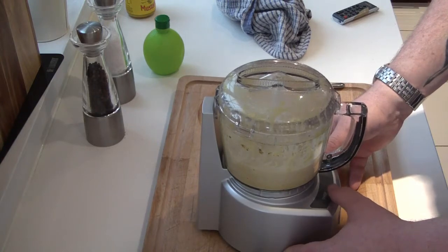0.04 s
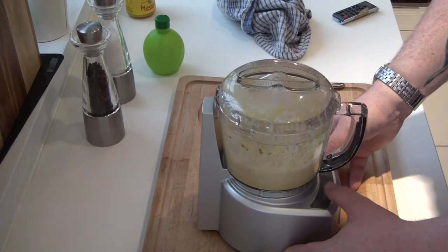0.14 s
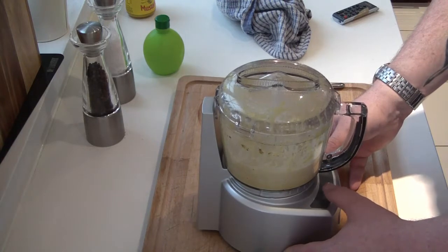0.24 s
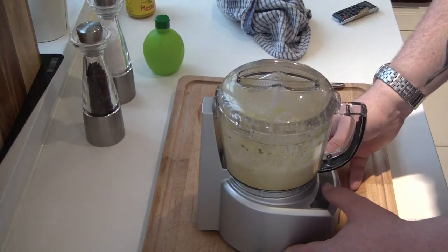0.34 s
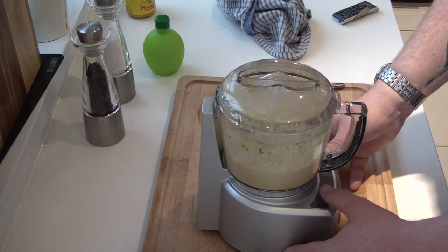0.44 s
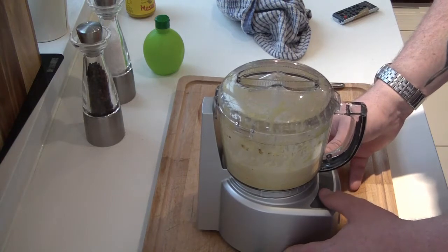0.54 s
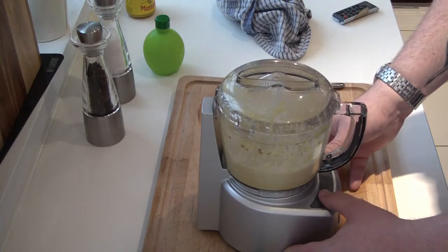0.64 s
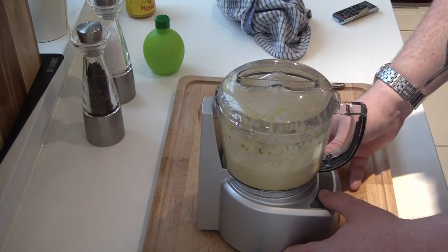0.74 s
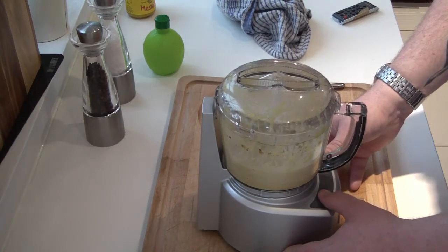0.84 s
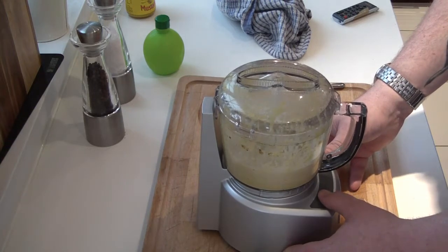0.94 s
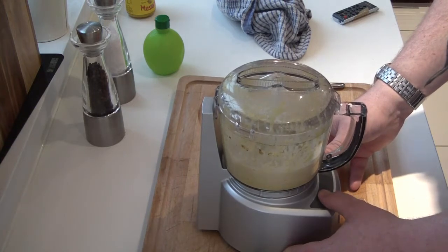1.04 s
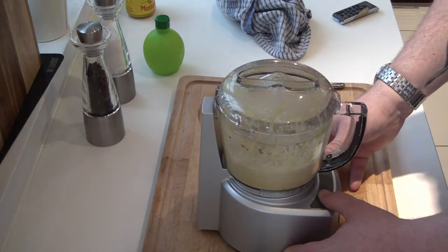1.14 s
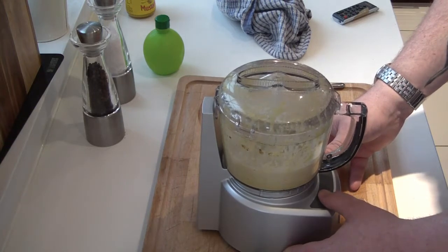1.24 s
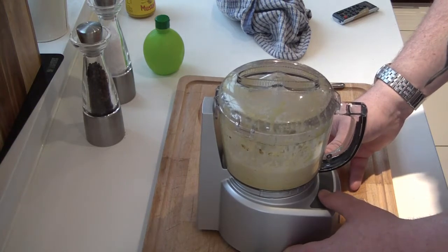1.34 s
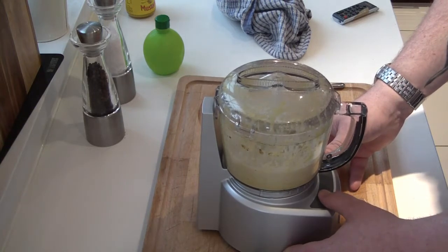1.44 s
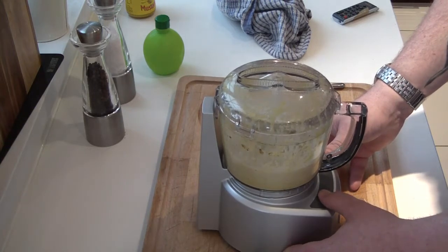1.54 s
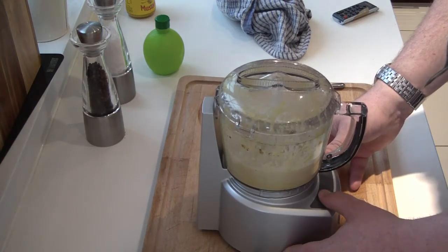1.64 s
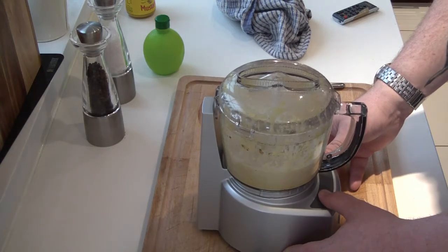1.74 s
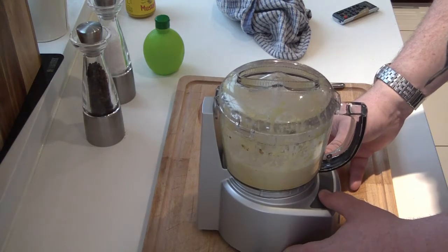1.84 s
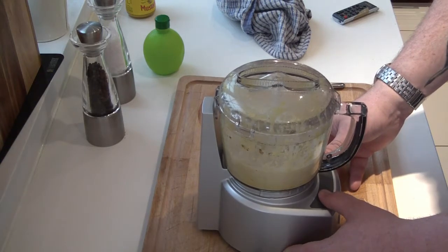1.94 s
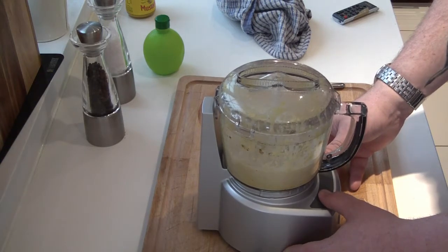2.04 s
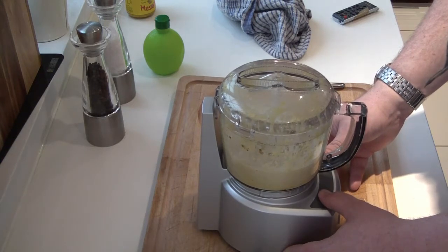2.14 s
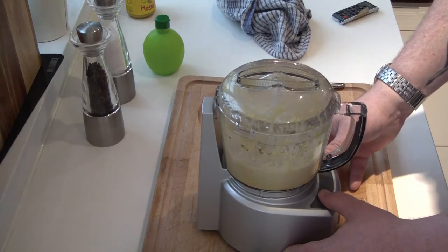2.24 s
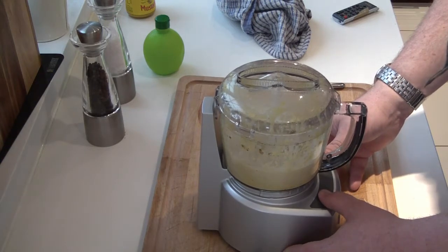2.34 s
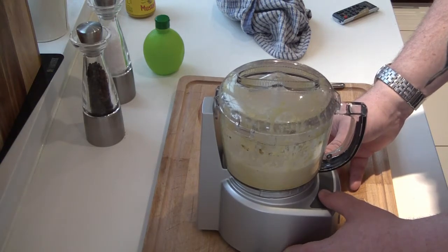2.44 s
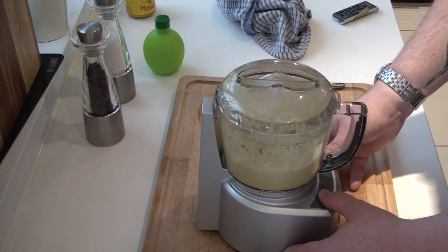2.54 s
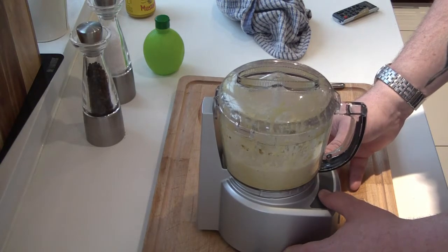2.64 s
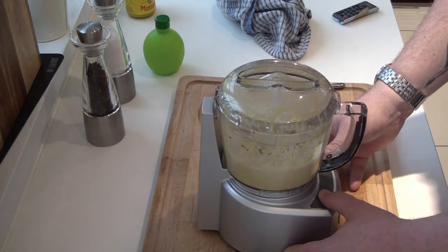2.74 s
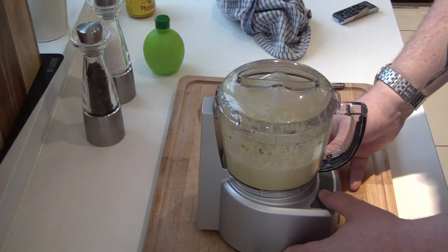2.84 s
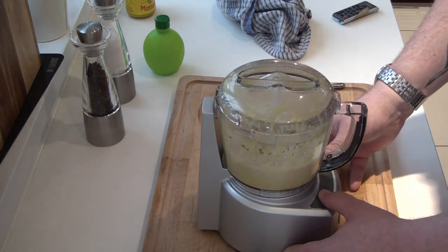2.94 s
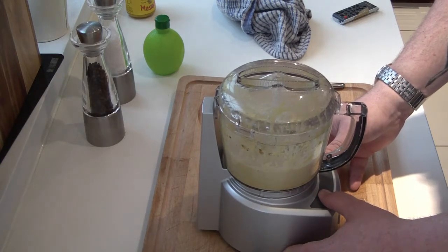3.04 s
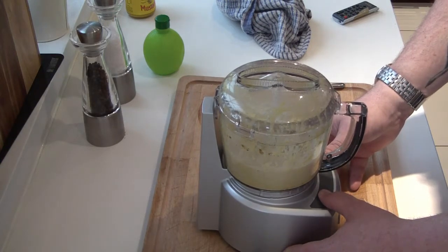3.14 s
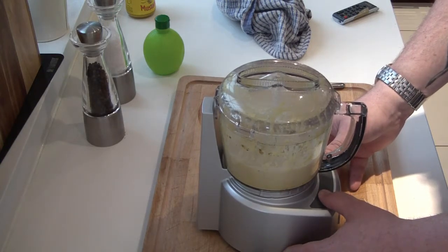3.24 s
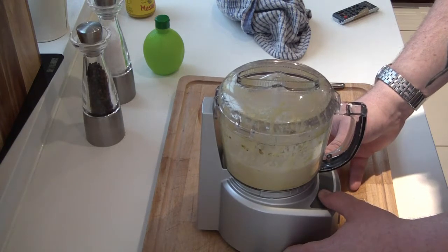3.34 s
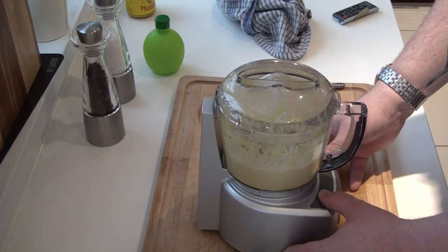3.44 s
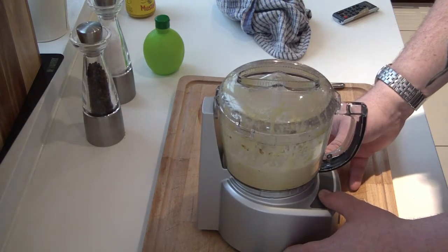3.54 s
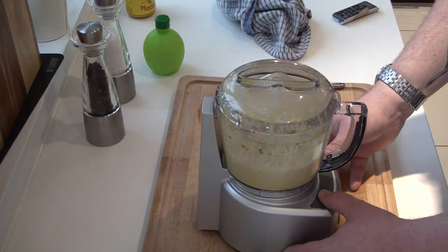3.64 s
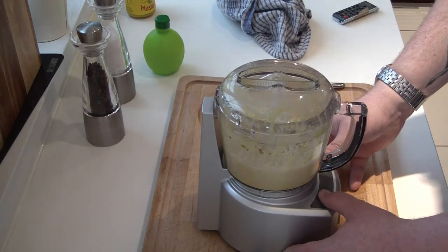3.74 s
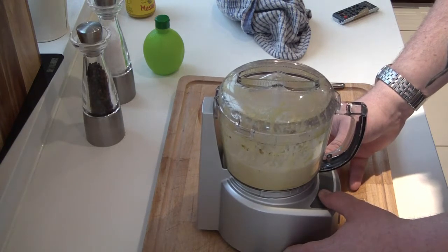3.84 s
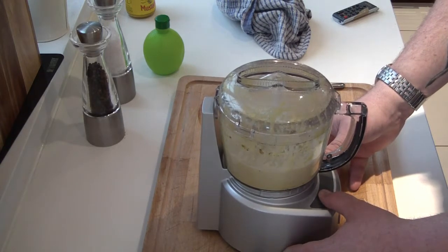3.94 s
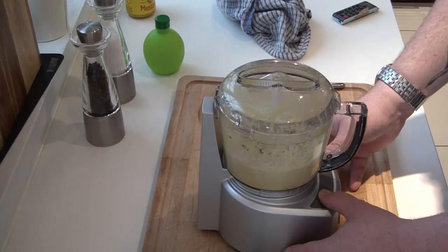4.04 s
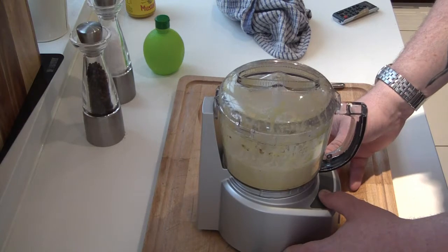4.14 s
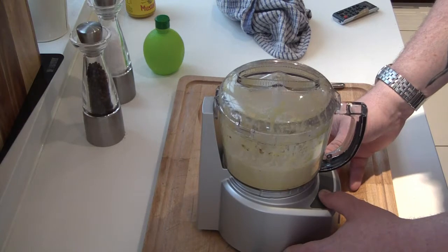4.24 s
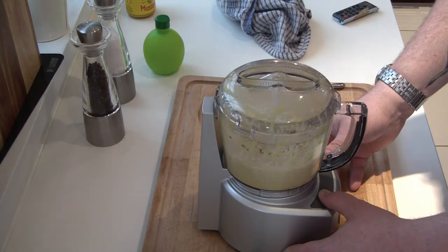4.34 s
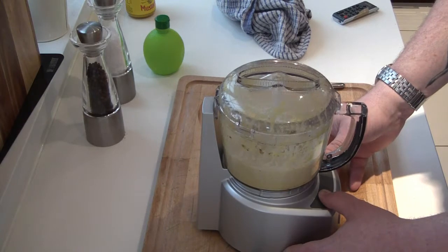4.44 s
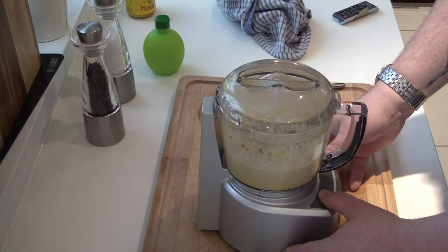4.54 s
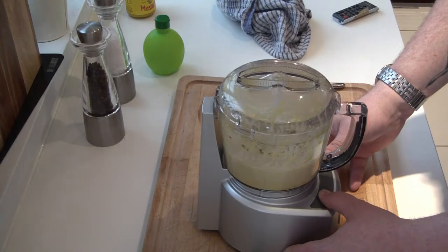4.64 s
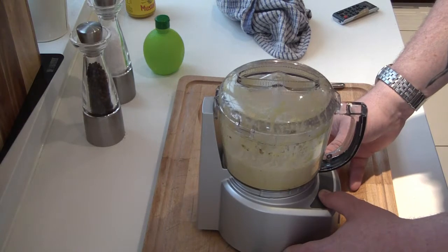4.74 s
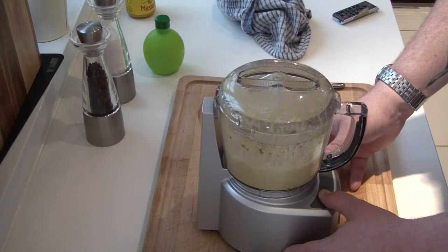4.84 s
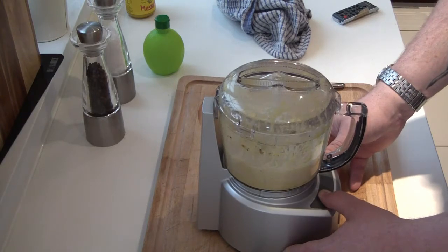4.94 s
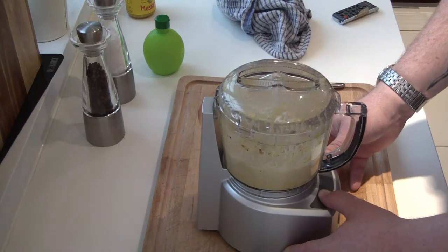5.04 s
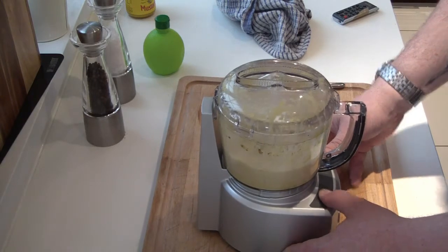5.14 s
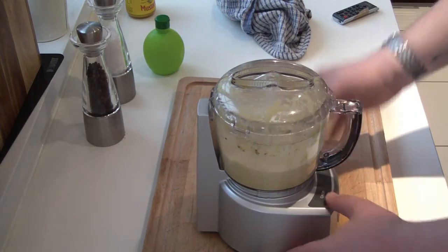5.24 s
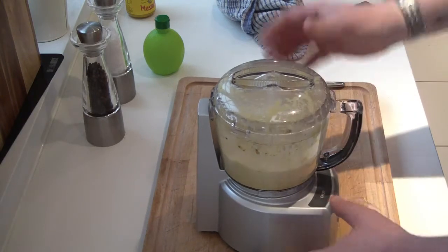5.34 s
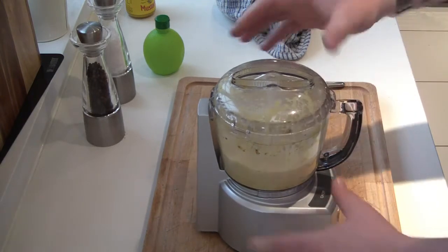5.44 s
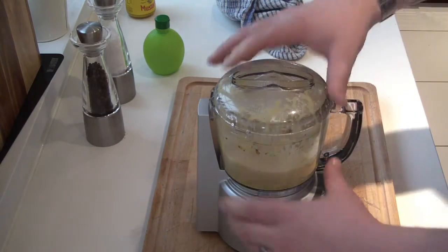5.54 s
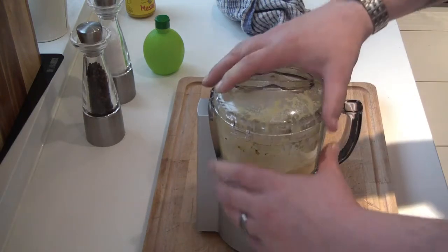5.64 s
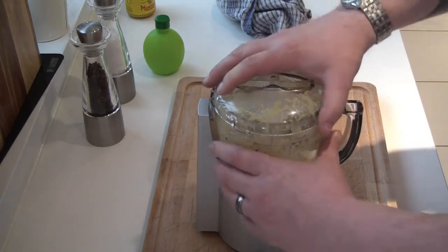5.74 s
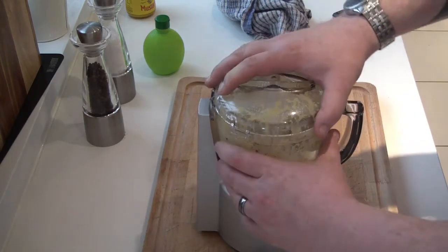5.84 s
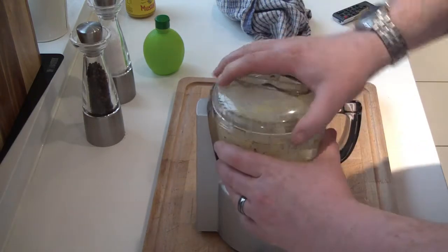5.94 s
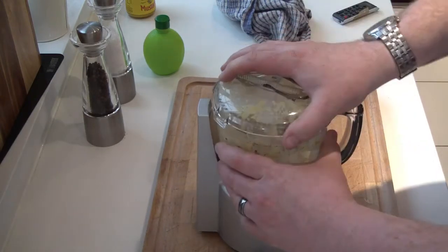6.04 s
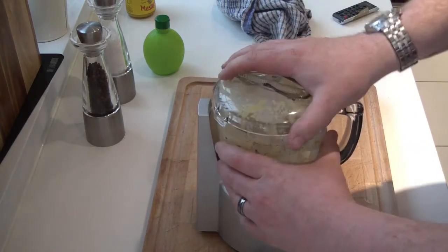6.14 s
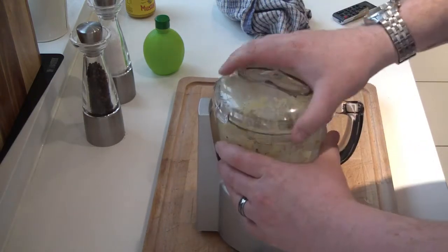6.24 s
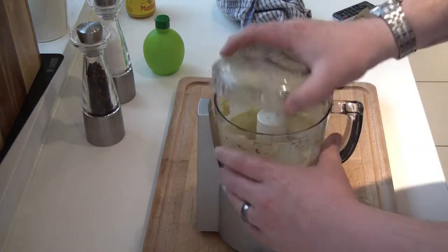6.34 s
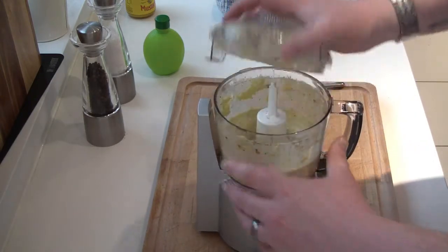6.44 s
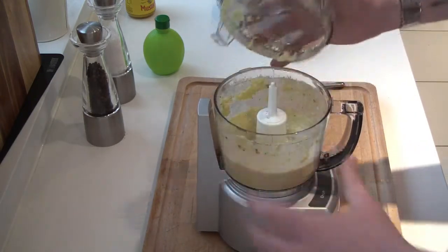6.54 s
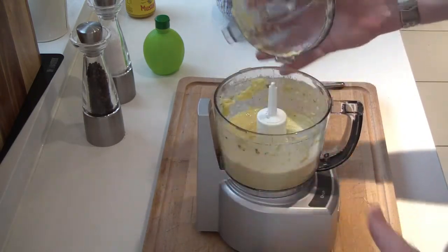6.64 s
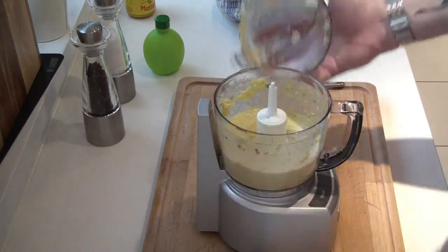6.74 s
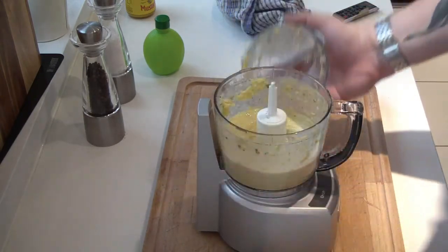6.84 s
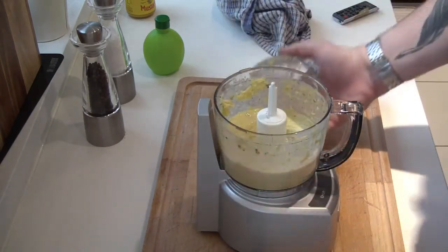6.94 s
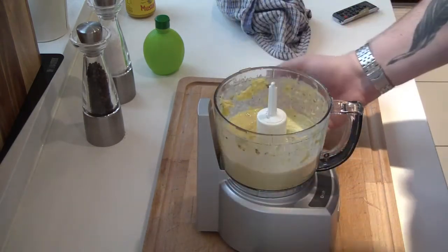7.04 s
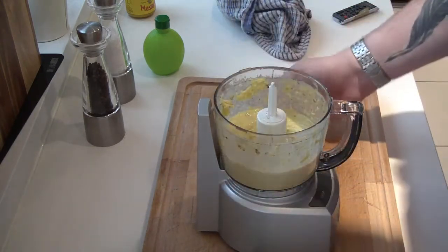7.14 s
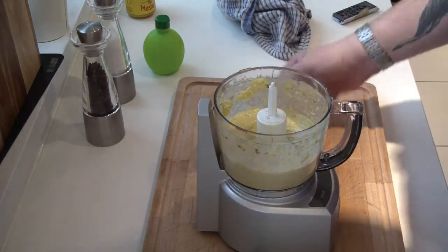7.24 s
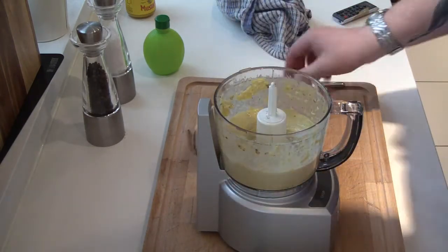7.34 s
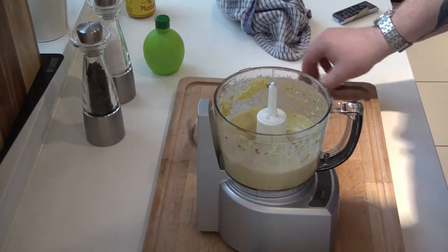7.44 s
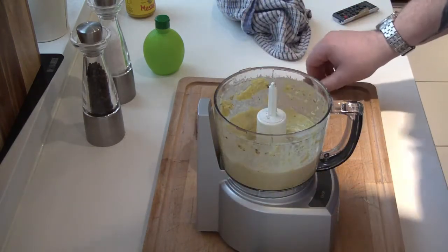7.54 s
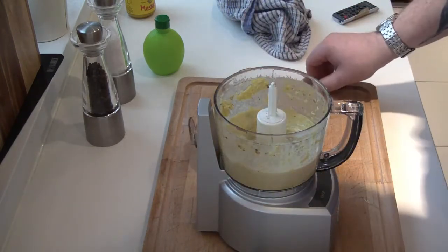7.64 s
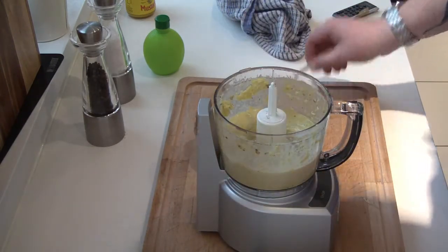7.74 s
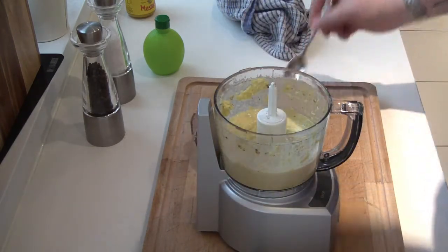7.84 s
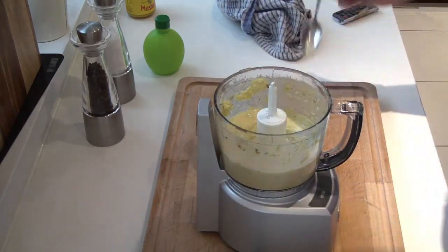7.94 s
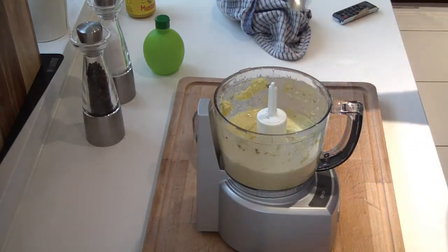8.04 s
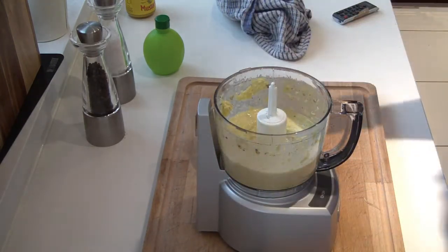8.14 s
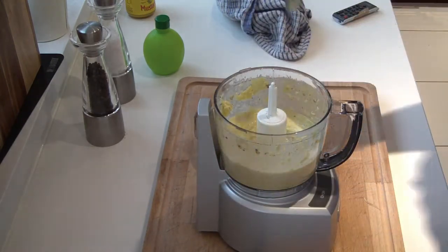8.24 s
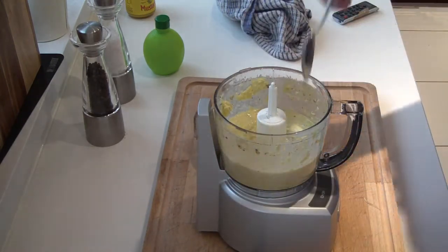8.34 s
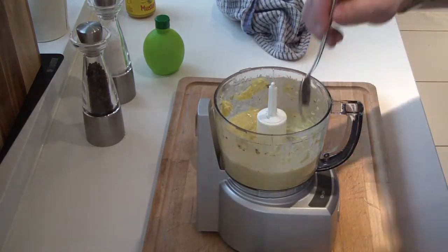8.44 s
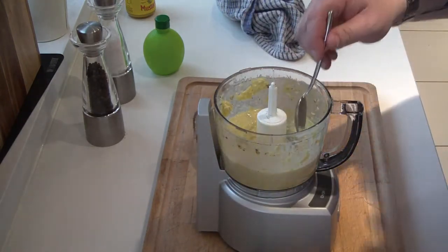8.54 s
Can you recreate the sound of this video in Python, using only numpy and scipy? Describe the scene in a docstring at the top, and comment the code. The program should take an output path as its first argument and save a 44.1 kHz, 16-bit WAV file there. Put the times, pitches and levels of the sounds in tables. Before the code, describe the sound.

Close, nearly mono sound in a reflective kitchen: a countertop food processor whines and rattles over a thick puree, interrupted early by a short falling and rising dip. It runs on, slightly wavering, then winds down to silence. Hands softly bump the bowl, a bright plastic crack frees the lid, and a cluster of hollow clacks and dull thuds follows as it is set down, leaving faint room air and rustle.

```python
"""A small food processor purees on a kitchen counter: already running, its motor is released, pressed
again, runs under a churning load and coasts to rest. Gear whine, tooth rattle and housing hum follow the shaft.
Then the plastic lid is twisted off with a snap (filtered noise), set down and rocks (thuds and struck modes).
Low bumps and swells of rumble and rustle lie over the air of the room. The microphone is nearly mono, and
the hard kitchen rings around it as decaying noise, below the direct sound."""
import sys
import numpy as np
from scipy import signal
from scipy.fft import rfft, irfft, next_fast_len
from scipy.io import wavfile
from scipy.ndimage import map_coordinates

SR = 44100
rng = np.random.default_rng(int(sys.argv[2]) if len(sys.argv) > 2 else 0)


def materialize(psi):
    """Save the field psi as 16-bit PCM at rate SR to the path in sys.argv[1].

    A 1-D psi becomes a single channel; in a 2-D psi each row is a channel.
    """
    bounded = np.clip(np.atleast_2d(psi).T, -1, 1)
    quanta = np.round(bounded * 32767).astype(np.int16)
    wavfile.write(sys.argv[1], SR, quanta)


N = 378378


def amp(db):
    """Decibels to gain."""
    return 10 ** (np.asarray(db) / 20)


def unit(x):
    """Scale to rms 1."""
    return x / np.sqrt(np.mean(x ** 2) + 1e-20)


def along(points, hz):
    """Read (Hz, value) points on a log frequency axis."""
    f, v = np.transpose(points)
    return np.interp(np.log(hz + 1), np.log(f + 1), v)


def wobble(rate):
    """A smooth random curve through normally distributed knots, rate knots a second."""
    knots = rng.standard_normal(int(N * rate / SR) + 4)
    return map_coordinates(knots, [np.arange(N) * rate / SR])


def filtered(x, response):
    """Multiply the spectrum of x by a response of frequency."""
    n = x.shape[-1]
    m = next_fast_len(n + SR // 4)
    return irfft(rfft(x, m) * response(np.fft.rfftfreq(m, 1 / SR)), m)[..., :n]


def coloured(x, spectrum, size=4096):
    """Shape x by a causal (minimum phase) filter of unit energy with the given spectrum."""
    cepstrum = irfft(np.log(amp(along(spectrum, np.fft.rfftfreq(size, 1 / SR)))))
    # folding the cepstrum forward in time makes the filter causal
    cepstrum[1:size // 2] *= 2
    cepstrum[size // 2 + 1:] = 0
    kernel = irfft(np.exp(rfft(cepstrum)))
    return signal.fftconvolve(x, kernel / np.linalg.norm(kernel))[:len(x)]


def resonant(x, peaks):
    """Pass x through parallel (Hz, width, dB) resonances."""
    def response(f):
        return sum(amp(db) * 1j * f * w / (c * c - f * f + 1j * f * w) for c, w, db in peaks)
    return filtered(x, response)


def soften(x, hz):
    """A soft contact loses its treble: a gentle low-pass at hz."""
    return signal.lfilter(*signal.butter(1, np.clip(hz, 50, SR * .45), fs=SR), x)


def add(track, s, sound):
    """Mix a sound in at time s."""
    part = track[round(s * SR):][:len(sound)]
    part += sound[:len(part)]


LOAD_SWAY, LOAD_RATE = .01, 9  # the food drags on the blade: share of the speed, changes a second


def motor(full_speed=292, churn=.018, blade_ratio=.19):
    """Whine, rattle, hum and throb all follow the shaft, which the churning food keeps tugging at."""
    speed, torque, powered = shaft_motion()
    running = speed > 0
    pace = np.clip(speed / full_speed, 0, 1)
    whine_db, rattle_db, hum_db = drive_levels(pace, torque)
    tug = churn * pace * wobble(14) + LOAD_SWAY * pace * wobble(LOAD_RATE)
    speed = speed * (1 + pace / 100 + tug)
    blade = 2 * np.pi * blade_ratio * np.cumsum(speed) / SR
    # the teeth bounce within their play and chatter under power
    bounce = wobble(260)
    chatter = CHATTER_DB * powered * (wobble(140) + 0.27 * np.sin(blade))
    mesh = mesh_phase(speed, pace, torque)
    whine = gear_whine(mesh, speed, bounce, chatter)
    impacts = unit(rng.standard_normal(N) * amp(bounce + 2.74 * wobble(1500) + 0.55 * chatter))
    rattle = tooth_rattle(impacts, pace)
    hum = housing_hum(speed, mesh, impacts)
    drive = amp(whine_db) * whine + amp(rattle_db) * rattle + amp(hum_db + 0.5) * hum
    return running * drive, running * amp(-39.5) * blade_throb(blade, pace)


# The switch is held down, the first time from before the start. Each row: on in seconds, off in seconds,
# top speed in turns a second before the small lift and tugging in motor().
PRESSES = [(-0.95, .378, 301), (.715, 5.272, 290)]
SPIN_UP_S, BITE_S = .108, .022  # time constants: pull up to speed, torque building as the gear takes up its play
FRICTION, DRAG = 560, 1.2  # coasting: steady loss (turns a second, each second), share of the speed lost (per s)


def shaft_motion():
    """Under power the shaft nears top speed as the torque falls; released, friction and drag slow it."""
    t = np.arange(N) / SR
    speed, torque, powered = np.zeros((3, N))
    for on, off, top in PRESSES:
        start = np.interp(on, t, speed)
        pull = top - (top - start) * np.exp(-np.clip(t - on, 0, off - on) / SPIN_UP_S)
        coast = (pull + FRICTION / DRAG) * np.exp(-DRAG * np.maximum(t - off, 0)) - FRICTION / DRAG
        speed = np.where(t >= on, np.maximum(coast, 0), speed)
        held = (t >= on) & (t < off)
        bite = 1 - np.exp(-np.abs(t - on) / BITE_S)
        torque = torque + held * (1 - pull / top) * bite
        powered = powered + held
    return speed, torque, powered


# Loudness of the drive at each speed, before strain and mix. Each row: share of full speed,
# gear whine in relative dB, tooth rattle in relative dB, shaft hum in relative dB.
LEVELS_BY_SPEED = [(0, -40, -13.5, -41), (0.102, -28, -19.5, -35.5), (.25, -33.5, -14, -40),
                   (.46, -29.5, -17, -27.5), (.6, -26.5, -19, -37.5), (.76, -17.5, -26.5, -34.5),
                   (1.001, -22.5, -19.5, -30.5)]
STRAIN_WHINE_DB, STRAIN_RATTLE_DB, STRAIN_HUM_DB = 10.5, 13, 15  # added at full torque
# over the first half second the whine is louder and the rattle slightly weaker: offsets at time zero, time constant
EARLY_WHINE_DB, EARLY_RATTLE_DB, EARLY_S = 4.5, -1.5, 0.51
JOLT_DB, JOLT_S = 14.5, 0.012  # switched on, the motor kicks the housing: strength, time to the peak


def drive_levels(pace, torque):
    """Levels of whine, rattle and hum in dB: set by the speed, raised by the strain."""
    t = np.arange(N) / SR
    share, whine_db, rattle_db, hum_db = np.transpose(LEVELS_BY_SPEED)
    early = np.exp(-t / EARLY_S)
    rise = np.maximum([t - on for on, off, top in PRESSES], 0) / JOLT_S
    jolt = np.sum(rise * np.exp(1 - rise), axis=0)
    whine = np.interp(pace, share, whine_db) + STRAIN_WHINE_DB * torque + EARLY_WHINE_DB * early
    rattle = np.interp(pace, share, rattle_db) + STRAIN_RATTLE_DB * torque + EARLY_RATTLE_DB * early
    hum = np.interp(pace, share, hum_db) + STRAIN_HUM_DB * torque + JOLT_DB * jolt
    return whine, rattle, hum


TEETH = 12
# jitter of the gear in turns a second: always, more at top speed, more at full torque
FLUTTER, TOP_FLUTTER, STRAIN_FLUTTER = 8, 5.55, 4.69


def mesh_phase(speed, pace, torque):
    """The tooth rate is the shaft speed times the teeth; it flutters most at top speed and under strain."""
    flutter = (FLUTTER + TOP_FLUTTER * pace ** 8 + STRAIN_FLUTTER * torque) * wobble(700)
    return 2 * np.pi * TEETH * np.cumsum(speed + flutter) / SR


# Gear mesh tones. Each row: multiple of the tooth rate, level in relative dB.
MESH_TONES = [(1, 0), (2, -9.5), (3, -9.5)]
CHATTER_DB = 1.05  # scale of the teeth's chatter under power
GEARBOX_HZ, GEARBOX_OCTAVES, GEARBOX_DB = 3400, 0.28, 9  # resonance lifting overtones: centre, spread, lift


def gear_whine(mesh, speed, bounce, chatter):
    """Mesh tones come in short bursts; overtones stand out as they glide through the gearbox's resonance."""
    whine = 0
    for k, db in MESH_TONES:
        octaves = np.log2((k * TEETH * speed + 1) / GEARBOX_HZ)
        lift = (k > 1) * GEARBOX_DB * np.exp(-(octaves / GEARBOX_OCTAVES) ** 2)
        whine = whine + amp(db + 2.0 * wobble(400) + lift) * np.sin(k * mesh)
    return unit(whine * amp(2.2 * bounce + chatter))


# Hiss and clatter of gears and fan at full speed. Each row: frequency in Hz, relative level in dB per Hz.
GEAR_HISS = [(100, -53), (350, -13.5), (700, -14), (1200, -13.5), (1420, -6.5), (2150, -12), (2600, -3),
             (3500, 1), (5000, -13.5), (7200, -2.5), (9100, -7.5), (10600, -4), (13000, -15.5),
             (15500, -22)]
# Loose teeth when the drive is below speed. Each row: frequency in Hz, relative level in dB per Hz.
LOOSE_TEETH = [(100, -17), (300, -33), (700, -0.5), (1500, 4.5), (2600, 11.5), (4200, 5.5), (7000, 1),
               (10500, -13), (15000, -15)]


def tooth_rattle(impacts, pace):
    """Tooth impacts: a dense bright hiss at speed, a looser and duller clatter when slow."""
    tight = pace ** 2.73
    hiss = np.sqrt(tight) * coloured(impacts, GEAR_HISS)
    return hiss + amp(-9) * np.sqrt(1 - tight) * coloured(impacts, LOOSE_TEETH)


# Unbalance of the shaft. Each row: multiple of the shaft rate, level in relative dB.
UNBALANCE = [(1, -2.5), (2, -15), (3, -12), (4, -13.5)]
# Resonances of the housing on its board. Each row: frequency in Hz, width in Hz, level in relative dB.
HOUSING_MODES = [(160, 40, -17), (222, 12, -7), (271, 14, 0), (313, 14, 0), (352, 30, -6), (540, 90, -20)]


def housing_hum(speed, mesh, impacts):
    """Unbalance, mesh tone and tooth impacts shake the resonant housing."""
    shaft = 2 * np.pi * np.cumsum(speed * (1.03 + .052 * wobble(28))) / SR
    shake = sum(amp(db) * np.sin(k * shaft) for k, db in UNBALANCE)
    shake = shake + amp(2) * np.sin(mesh) + amp(12.5) * impacts
    return unit(resonant(shake, HOUSING_MODES))


def blade_throb(blade, pace):
    """The blade's low throb, strongest at full speed, beats against a faint 50 Hz mains hum."""
    mains = np.sin(2 * np.pi * 50 * np.arange(N) / SR)
    return (np.sin(blade) + amp(-28) * mains) * pace ** 4


# Snaps and scrapes of the lid, on its catch and later as it is set down. Each row: start in seconds,
# level in relative dB, brightness in Hz, scrape length in seconds (time to fall 30 dB).
SNAPS = [(5.908, -28, 4000, 0.017), (5.967, -23, 4930, 0.0089), (5.9712, 3.5, 13000, 0.0061),
         (5.9744, -5, 9000, 0.0094), (5.988, -15, 12000, 0.011), (6.297, -28.5, 2000, 0.034),
         (6.369, -25, 9000, 0.013), (7.061, -32.5, 4000, 0.022), (7.101, -20, 5780, 0.0068),
         (7.232, -31.5, 12120, 0.046), (7.423, -30.5, 15000, 0.012)]
# Bowl and lid sounding together. Each row: frequency in Hz, relative level in dB per Hz.
BOWL_COLOUR = [(60, -35), (130, -9), (260, -7), (400, -12.5), (480, -2.5), (730, -1.5), (1000, -9),
               (1400, -9.5), (1900, -10.5), (2420, -6), (3300, -6.5), (5000, -13.5), (12500, -15),
               (15500, -14)]


def lid_snaps():
    """Plastic snaps and scrapes of the lid, first on its catch, later as it is set down; each buzzes briefly."""
    out, t = np.zeros(N), np.arange(SR // 5) / SR
    for s, db, bright_hz, length in SNAPS:
        decay = amp(-60 * t / (2 * length))
        buzz = amp(-23.5 - 60 * t / 0.5)
        scrape = rng.standard_normal(len(t)) * (decay + buzz)
        add(out, s, amp(db - 5.0) * soften(scrape, bright_hz))
    snap = coloured(out, BOWL_COLOUR)
    return snap + resonant(snap, [(1010, 80, -4), (2380, 130, -1)])


# The lid on the counter. Each row: start in seconds, level in relative dB, brightness in Hz,
# rim level in relative dB.
LID_KNOCKS = [(7.102, 0.5, 3990, 2), (7.1075, -1, 3000, -26), (7.122, -17, 1200, -22),
              (7.147, 0, 1510, -39), (7.172, -14, 5000, -10), (7.196, -17, 3500, -3),
              (7.232, -12.5, 3500, -24), (7.249, -17, 2500, -16), (7.478, -12.5, 3500, 4),
              (7.502, -8, 600, -7), (7.623, -16, 500, 0), (7.635, -7.5, 700, 6.5), (7.645, -6, 700, 3.5),
              (7.726, -13, 550, 3), (7.746, -14, 500, -15), (7.872, -16.5, 380, -12), (7.982, -23, 394, -5)]
# Modes of lid and counter. Each row: frequency in Hz, level in relative dB, time to fall 60 dB in seconds.
LID_MODES = [(161, -9, .5), (207, -12, .25), (307, -8, .3), (463, -2, .35), (502, -6, .1), (528, -3, .3),
             (657, -2, .2), (681, -4, .2), (813, -4, .2), (1012, -10, .12), (1357, -14, .12),
             (1626, -5, .18), (2347, -1, .2), (2557, -9, .12), (2972, -11, .16), (3521, -9, .18),
             (4161, -14, .13)]
# Modes of the lid's thin rim. Each row: frequency in Hz, level in relative dB, time to fall 60 dB in seconds.
RIM_MODES = [(1690, -3.5, 0.049), (1850, -13, 0.058), (2025, 5.5, 0.014), (2080, 1, 0.045),
             (2215, -6, 0.018), (2390, -2, 0.035), (2600, -1, 0.017)]
# The dull body of a knock. Each row: frequency in Hz, relative level in dB per Hz.
THUD_COLOUR = [(30, -16), (110, -6), (250, -4), (500, 0), (850, -2), (1150, -12), (1600, -10), (2600, -13),
               (4200, -21), (6000, -33), (14000, -42)]


def lid():
    """The lid lands and rocks: each contact is a thud, a ring of lid and counter, and a clack of the rim."""
    out, t = np.zeros(N), np.arange(SR // 2) / SR
    for s, db, bright_hz, rim_db in LID_KNOCKS:
        thud = coloured(rng.standard_normal(len(t)) * amp(-60 * t / 0.038), THUD_COLOUR)
        thud = thud / np.linalg.norm(thud)
        body = soften(amp(-15.0) * ringing(LID_MODES, t) + amp(19.0) * thud, bright_hz)
        clack = ringing(RIM_MODES, t) * (1 - np.exp(-t / 0.00025))
        add(out, s, amp(db) * (body + amp(rim_db - 11) * clack))
    return out


def ringing(modes, t):
    """Struck modes die away, with new strengths and signs for every blow."""
    out = np.zeros(len(t))
    for hz, db, t60 in modes:
        strength = amp(db + rng.normal(0, 3.3) - 60 * t / t60)
        out += strength * rng.choice([-1, 1]) * np.sin(2 * np.pi * hz * t)
    return out


# Hands bump the bowl and counter. Each row: start in seconds, level in relative dB, frequency in Hz,
# length in seconds (the peak comes after a seventh of it).
HAND_BUMPS = [(5.918, -22, 316, 0.04), (5.974, -17, 281, 0.073), (6.04, -21, 69.4, 0.045),
              (6.055, -22, 157, .09), (6.13, -17.5, 124, 0.031), (6.343, -41, 273, 0.039),
              (6.349, -28.5, 56, 0.13), (6.665, -36, 610, 0.081), (6.696, -41, 172, 0.053),
              (6.762, -32.5, 392, 0.062), (7.73, -21, 161, 0.13), (8.215, -33.5, 296, 0.038),
              (8.34, -36.5, 164, 0.071), (8.403, -40.5, 292, 0.11)]


def bumps():
    """Soft, low knocks of hands on bowl and counter: a tone and a rub of noise swell and fade."""
    out, t = np.zeros(N), np.arange(SR // 3) / SR
    for s, db, hz, length in HAND_BUMPS:
        rise = t / (length / 7)
        rub = unit(soften(resonant(rng.standard_normal(len(t)), [(hz, hz, 0)]), 3 * hz))
        tone = np.sin(2 * np.pi * hz * t)
        add(out, s, amp(db) * (tone + .7 * rub) * rise * np.exp(1 - rise))
    return out


# Steady air of the room. Each row: frequency in Hz, relative level in dB per Hz.
AIR_COLOUR = [(53, -37), (90, -17), (165, 2), (183, 2), (200, -53), (276, 8), (424, -39), (463, 5),
              (586, -16), (667, -34), (793, -9), (5880, -26), (15500, -23.5)]


def room_noise():
    """Steady air in coloured noise, with a low rumble and a rustle that swell now and then."""
    rumble_db, rustle_db = swell_levels()
    air = amp(-47 + 1.06 * wobble(8)) * coloured(rng.standard_normal(N), AIR_COLOUR)
    # Each row: frequency in Hz, relative level in dB per Hz
    low = [(20, -12.0), (50, 16), (90, -19.0), (160, -1.5), (300, -3.0), (600, -37), (3000, -51)]
    high = [(500, 6.5), (4000, 2.0), (15000, -14.5)]
    rumble = amp(rumble_db + 3.3 * wobble(7.9)) * coloured(rng.standard_normal(N), low)
    rustle = amp(rustle_db + 0.4 * wobble(13)) * coloured(rng.standard_normal(N), high)
    return air + rumble + rustle


# Swells of low rumble and rustle: hands and sleeves move, and at 7.56 s the lid rolls on the counter.
# Each row: middle in seconds, half length in seconds, rumble in dB, rustle in dB.
SWELLS = [(6.71, 0.12, -39.5, -43.5), (7.01, 0.12, -60, -49), (7.56, 0.096, -27, -50),
          (7.798, .13, -44, -48), (8.06, 0.3, -39, -48.5), (8.58, 0.16, -45, -45.5)]
RUMBLE_DB, RUSTLE_DB = -48, -57  # the room at rest


def swell_levels():
    """Levels of rumble and rustle in dB: soft swells in power over the room at rest."""
    t = np.arange(N) / SR
    rumble, rustle = amp(RUMBLE_DB) ** 2, amp(RUSTLE_DB) ** 2
    for s, half, rumble_db, rustle_db in SWELLS:
        swell = np.exp(-((t - s) / half) ** 2)
        rumble = rumble + swell * amp(rumble_db) ** 2
        rustle = rustle + swell * amp(rustle_db) ** 2
    return 10 * np.log10(rumble), 10 * np.log10(rustle)


# Reverberation of the hard kitchen. Each row: frequency in Hz, time to fall 60 dB in seconds.
KITCHEN_DECAY = [(100, 0.63), (300, 0.7), (1000, 0.74), (3000, 0.7), (7000, 0.67), (14000, 0.32)]


def kitchen(x, build=0.015):
    """Reflections build up (time constant in s) and each frequency dies at its own speed."""
    hz, t, z = signal.stft(rng.standard_normal(SR), SR, nperseg=256)
    decay = amp(-60 * t / along(KITCHEN_DECAY, hz)[:, None])
    tail = signal.istft(z * decay * (1 - np.exp(-t / build)), SR, nperseg=256)[1]
    return signal.fftconvolve(x, tail / np.linalg.norm(tail))[:N]


# Stereo width of the reverberation: narrow in the middle range, wide in the treble.
# Each row: frequency in Hz, side level in dB.
REVERB_WIDTH = [(50, -12), (250, -20), (550, -15.5), (1200, -31), (3000, -11), (7000, -4), (13000, 1)]
# The machine's direct sound, leaning left. Each row: frequency in Hz, side share as a gain.
MACHINE_LEAN = [(300, 0.073), (2000, 0), (3500, 0.094), (5500, 0.025), (9000, 0.23), (14000, 0.035)]


def scene():
    """Machine and lid in the room; mainly the reverberation spreads between left and right."""
    machine, throb = motor()
    snap, knocks = lid_snaps(), lid() + bumps()
    floor = room_noise()
    sent = amp(-4) * machine + amp(3.5) * snap + amp(-7.0) * knocks
    direct = amp(0.5) * machine + amp(6.0) * snap + knocks
    mid = direct + kitchen(sent) + throb + floor
    side = filtered(kitchen(amp(-3) * sent + floor + throb), lambda hz: amp(along(REVERB_WIDTH, hz)))
    # the machine, its treble above all, leans a little to the left
    side += filtered(machine, lambda hz: along(MACHINE_LEAN, hz))
    return np.array([mid + side, mid - side])


TOP_HZ = 15500  # band limit of the microphone signal


def record(dry):
    """The loudest blows overload the microphone input; a steep band limit removes the extreme treble."""
    clipped = dry / (1 + np.abs(dry / .95) ** 6) ** (1 / 6)
    return filtered(clipped, lambda hz: 1 / (1 + (hz / TOP_HZ) ** 120))


dry = scene()
out = record(dry)
materialize(out)
```